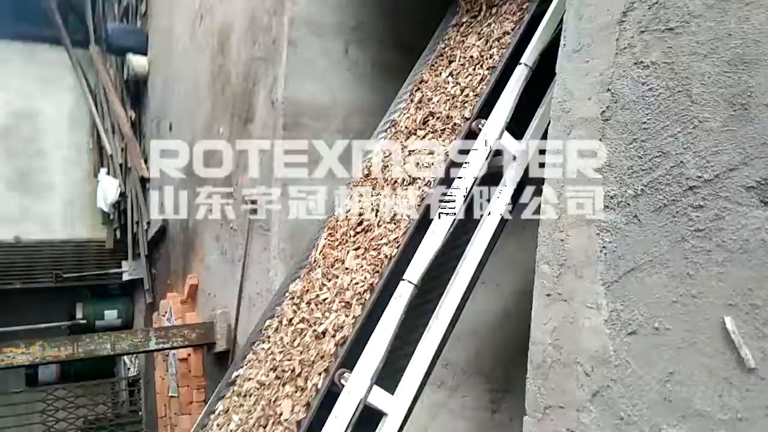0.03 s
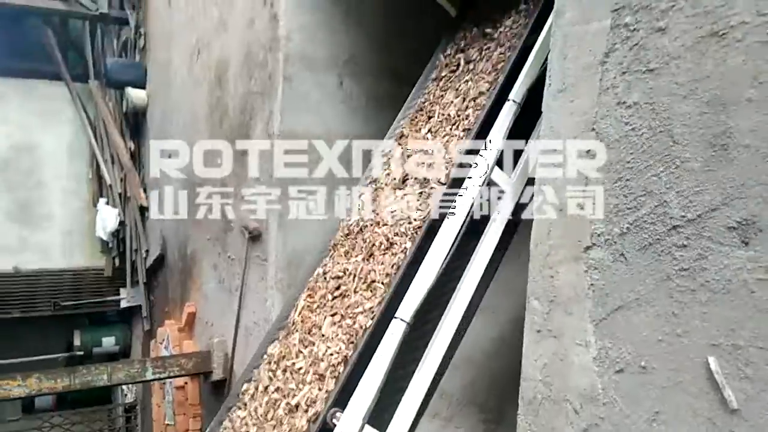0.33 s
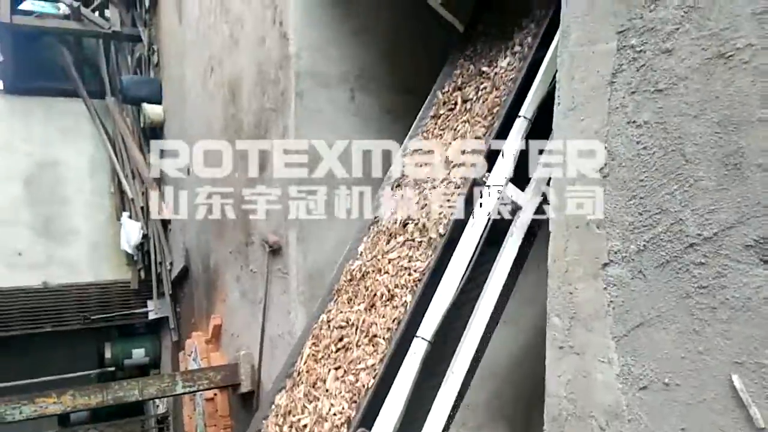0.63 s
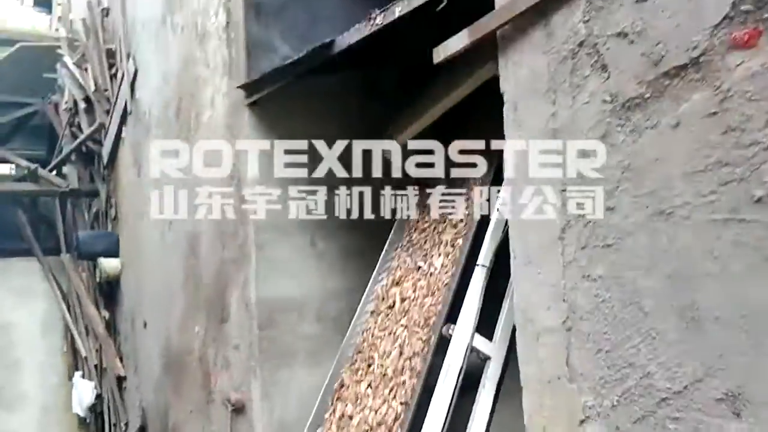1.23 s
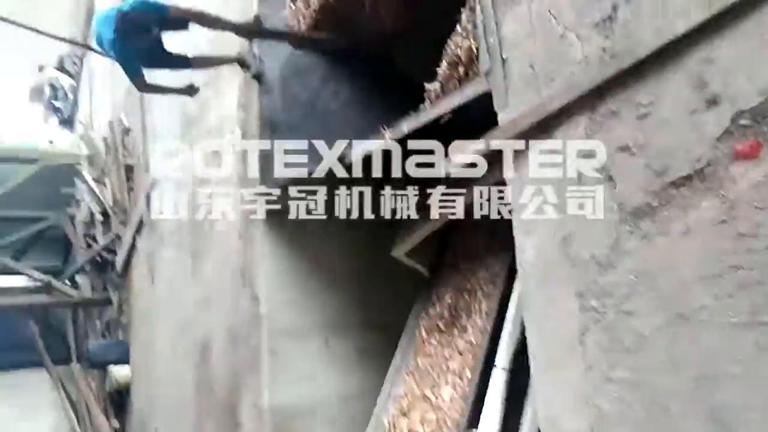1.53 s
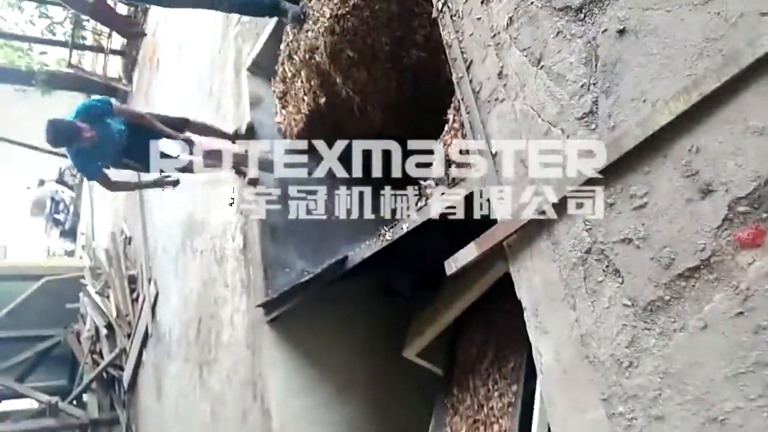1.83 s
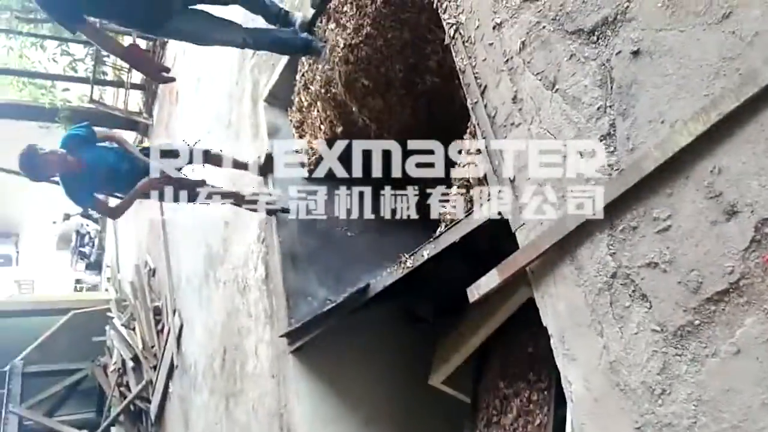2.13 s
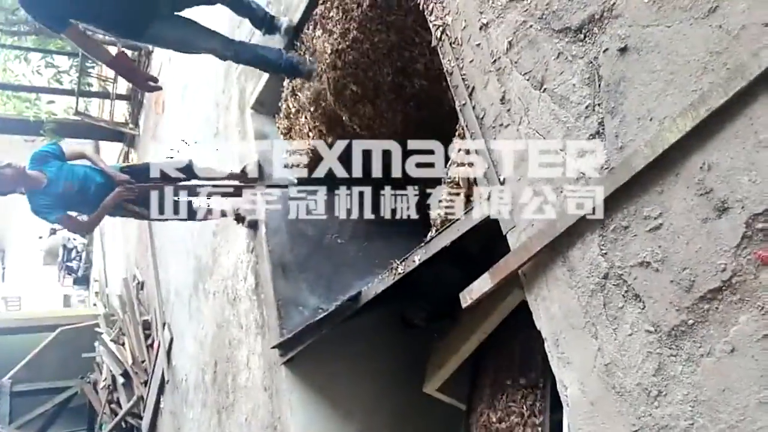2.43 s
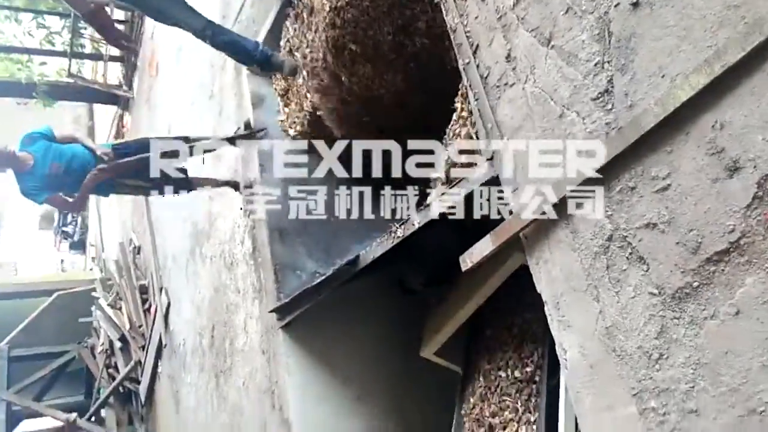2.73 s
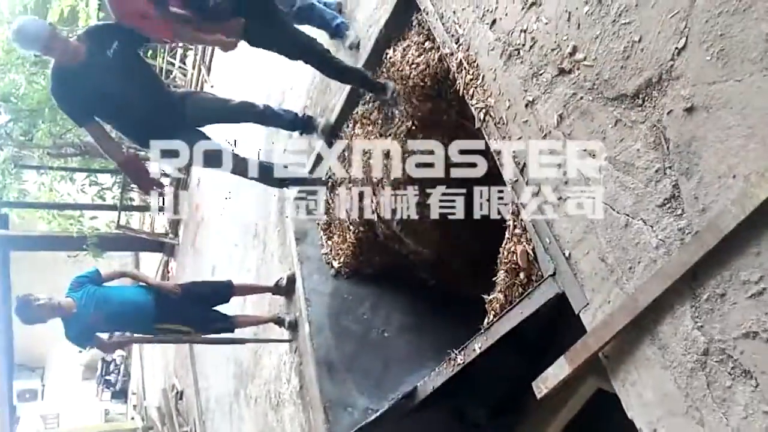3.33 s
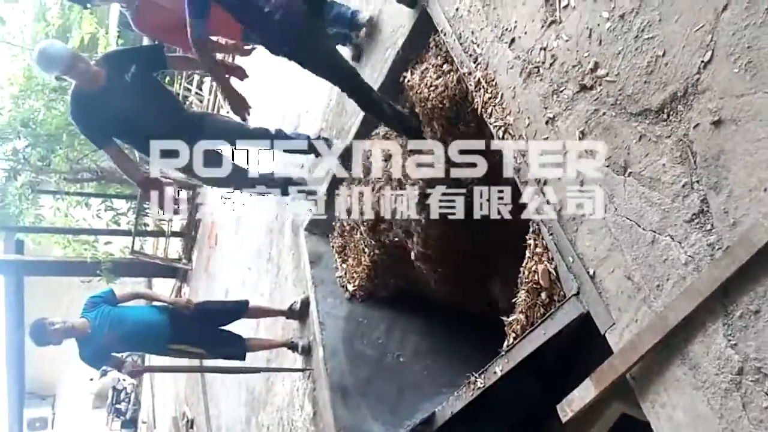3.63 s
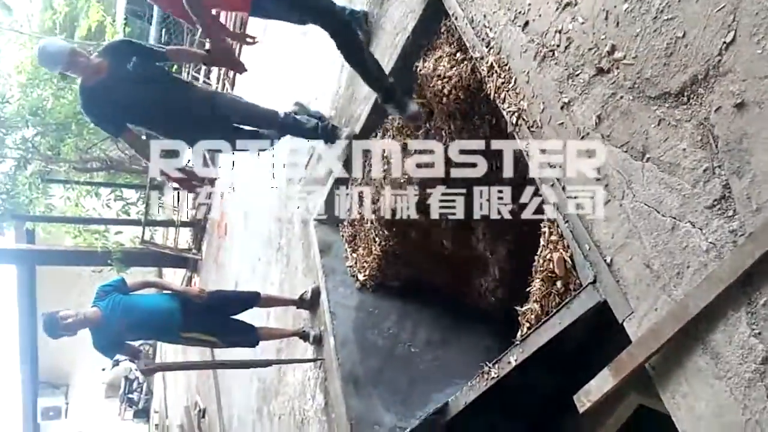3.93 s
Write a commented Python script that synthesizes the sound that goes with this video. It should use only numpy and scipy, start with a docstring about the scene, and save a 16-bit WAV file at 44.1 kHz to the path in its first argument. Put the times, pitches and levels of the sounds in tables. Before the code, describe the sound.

A wood chipper runs steadily with a loud roar, hum and dense rattle of chips.

```python
"""A rotor's hum, a machine's roar and a dense rattle cut in together at 0.34 s: a wood chipper
running steadily in a concrete yard, heard from beside its discharge conveyor.
Chips strike the chute and belt, churning air and wood drive the housing, motors add weak tones.
The microphone swings to the belt, then to the chip pit, which shifts the colour of the rattle."""
import sys
import numpy as np
from scipy import signal
from scipy.fft import rfft, irfft, next_fast_len
from scipy.io import wavfile
from scipy.ndimage import map_coordinates

SR = 44100
rng = np.random.default_rng(int(sys.argv[2]) if len(sys.argv) > 2 else 0)


def waveform_to_disk(signal):
    """Save audio, clipped to [-1, 1], as 16-bit WAV at the path in sys.argv[1]."""
    frames = np.transpose(np.atleast_2d(signal))
    scaled = np.clip(frames, -1, 1) * 32767
    samples = np.round(scaled).astype(np.int16)
    wavfile.write(sys.argv[1], SR, samples)


N = 176400

ROTOR_HZ, HUM_FLUTTER_DB, HUM_JITTER_RAD = 299.5, .65, .087
CHIPS_PER_S, CHIP_SCATTER_DB, CHIP_T60_S = 900, 2.5, .0054
TICKS_DB = -7  # relative to the rush
SURGE_DB, SURGE_PER_S = .64, 22
TREBLE_HZ, WHINE_HZ = 4200, 794
START_S, TOP_HZ = .34, 10200

# Rotor hum as the microphone moves (time [s], fundamental [dB], 2nd harmonic [dB], 3rd harmonic [dB])
HUM_LEVELS = [(.4, -27.5, -42, -44), (1.0, -27, -37, -48), (1.22, -27, -37, -45), (1.3, -27, -35, -41),
              (1.55, -27, -36, -46.5), (1.66, -29.5, -38, -40), (1.95, -27, -37, -42.5),
              (2.13, -28, -35.5, -37), (2.35, -27, -40, -40.5), (2.68, -27.5, -38.5, -38.5),
              (2.9, -27.5, -34.5, -49), (3.35, -27, -32, -44.5), (3.78, -27.5, -31.5, -52),
              (4.0, -26.5, -34.5, -43)]
# Rattle spectrum facing the belt (frequency [Hz], relative density [dB])
BELT_SPECTRUM = [(300, -24), (800, -12), (1200, -2.5), (1750, -5), (2230, 1.5), (2620, -8), (3100, -5),
                 (4150, -7.5), (4800, -19.5), (5250, -19), (6000, -26.5), (6500, -33.5), (7200, -44.5),
                 (8200, -53.5), (10000, -61.5)]
# Rattle spectrum facing the pit (frequency [Hz], relative density [dB])
PIT_SPECTRUM = [(300, -26), (800, -7.5), (1300, -2.5), (1800, -2.5), (2300, 0.5), (2650, 0.5), (3000, -5),
                (4100, -8), (4850, -14), (5350, -22.5), (6000, -28), (6500, -36.5), (7200, -45),
                (8200, -53.5), (10000, -63.5)]
# Microphone aim (time [s], aim [0 = belt, 1 = pit])
MIC_AIM = [(.36, 0.73), (.7, 0.025), (1.07, 0), (1.24, 0.89)]
# Rattle treble, dulling briefly around the turn (time [s], gain [dB])
TREBLE_GAIN = [(.4, 1.5), (.7, -2), (1.12, 0), (1.38, -4), (1.55, -1), (2.9, 0), (3.4, 0.5), (4.0, -1)]
# Housing roar spectrum (frequency [Hz], relative density [dB])
ROAR_SPECTRUM = [(20, -34.5), (40, -24), (70, -13.5), (100, -14), (140, -6.5), (185, -2), (250, -2),
                 (400, -1), (465, -1.5), (530, -0.6), (650, -4.5), (715, -2.5), (750, -3), (790, -4),
                 (870, -5.5), (1000, -5.5), (1500, -11), (2200, -16), (4000, -42.5), (9000, -88)]
# Noise levels (time [s], roar [dB], rattle [dB])
NOISE_LEVELS = [(.4, -29, -29.5), (1.0, -29, -30), (1.5, -29, -29.5), (2.2, -29.5, -30), (2.8, -30, -30),
                (3.3, -30.5, -31), (4.0, -30, -31)]
# Motor, drive and bearing tones (frequency [Hz], level [dB], phase wander [rad])
DRIVE_TONES = [(50, -55.5, .1), (178.5, -48, .6), (199.7, -46, .3), (248.5, -45, .8), (351.5, -38.5, .8),
               (382.4, -44, .3), (1897, -53, .8), (6034, -75.5, 1.2)]
# Drive whine (time [s], level [dB])
WHINE_LEVEL = [(.4, -44.5), (1.5, -49), (1.8, -41), (2.5, -49.5), (3.25, -39), (4.0, -46.5)]


def rotor_hum():
    """The spinning rotor hums in three harmonics that flutter slightly with the load."""
    drift_rad = HUM_JITTER_RAD * wobble(12)
    return sum(amp(level_db + HUM_FLUTTER_DB * wobble(15)) * tone(k * ROTOR_HZ, k * drift_rad)
               for k, level_db in enumerate(curves(HUM_LEVELS), 1))


def chip_rattle():
    """Countless small impacts merge into a rush; the nearer ones tick through it."""
    rush, crack, size = rng.standard_normal((3, N))
    hits = (rng.random(N) < CHIPS_PER_S / SR) * amp(CHIP_SCATTER_DB * np.clip(size, -2, 2))
    decay_per_sample = amp(-60 / (CHIP_T60_S * SR))
    energy = signal.lfilter([1], [1, -decay_per_sample ** 2], hits ** 2)
    ticks = amp(TICKS_DB) * unit(crack * np.sqrt(energy))
    flow = (rush + ticks) * amp(SURGE_DB * wobble(SURGE_PER_S))  # uneven chip flow
    aim, = curves(MIC_AIM)
    rattle = (1 - aim) * coloured(flow, BELT_SPECTRUM) + aim * coloured(flow, PIT_SPECTRUM)
    treble = filtered(rattle, lambda hz: 1 - 1 / (1 + (hz / TREBLE_HZ) ** 10))
    treble_db, = curves(TREBLE_GAIN)
    return rattle + (amp(treble_db) - 1) * treble


def housing_roar():
    """Churning air and wood make the steel housing roar."""
    return coloured(rng.standard_normal(N), ROAR_SPECTRUM) * amp(.3 * wobble(9.5))


def drive_tones():
    """Motors, belts and bearings add weaker, less steady tones."""
    whine_db, = curves(WHINE_LEVEL)
    whine = amp(whine_db) * tone(WHINE_HZ, .5 * wobble(7))
    return whine + sum(amp(db) * tone(hz, wander_rad * wobble(8)) for hz, db, wander_rad in DRIVE_TONES)


def amp(db):
    """Decibels to gain."""
    return 10 ** (np.asarray(db) / 20)


def unit(x):
    """Scale to rms 1."""
    return x / np.sqrt(np.mean(x ** 2) + 1e-20)


def clock_s():
    """Time of each sample."""
    return np.arange(N) / SR


def curves(rows):
    """One per-sample curve for each column after the time."""
    time_s, *columns = np.transpose(rows)
    return [np.interp(clock_s(), time_s, column) for column in columns]


def wobble(knots_per_s):
    """Smooth random curve, rms near 1."""
    return map_coordinates(rng.standard_normal(1024), [clock_s() * knots_per_s + 2], mode="wrap")


def filtered(x, response):
    """Zero-phase filter with gain response(hz)."""
    n_fft = next_fast_len(N + 8192)
    return irfft(rfft(x, n_fft) * response(np.fft.rfftfreq(n_fft, 1 / SR)), n_fft)[:N]


def coloured(x, spectrum):
    """x shaped by (frequency [Hz], gain [dB]) points, at rms 1."""
    points_hz, points_db = np.transpose(spectrum)
    return unit(filtered(x, lambda hz: amp(np.interp(np.log(hz + 1), np.log(points_hz), points_db))))


def tone(hz, drift_rad):
    """Sine of rms 1 with drifting phase."""
    return np.sqrt(2) * np.sin(2 * np.pi * (hz * clock_s() + rng.random()) + drift_rad)


def scene():
    """The whole machine at the microphone, mono."""
    roar_db, rattle_db = curves(NOISE_LEVELS)
    tones = rotor_hum() + drive_tones()
    return (tones + amp(roar_db) * housing_roar() + amp(rattle_db) * chip_rattle())[None]


def record(dry):
    """The microphone opens in 3 ms at START_S and passes nothing above TOP_HZ."""
    gate = np.clip((clock_s() - START_S) / .003, 0, 1)
    return filtered(dry[0] * gate, lambda hz: np.clip((TOP_HZ - hz) / 200, 0, 1))[None]


dry = scene()
out = record(dry)
waveform_to_disk(out)
```